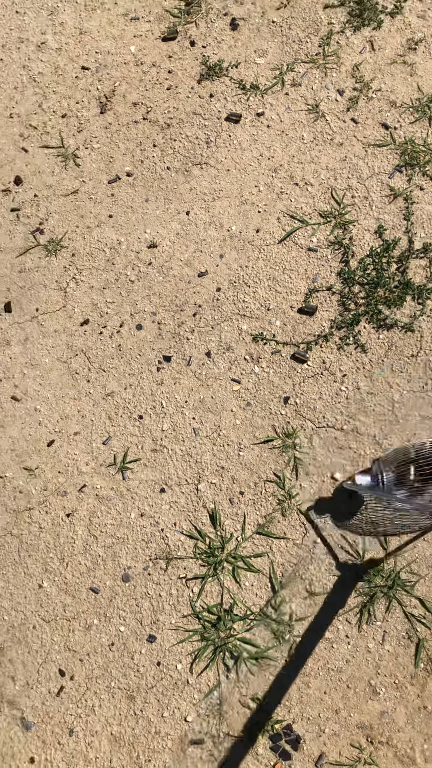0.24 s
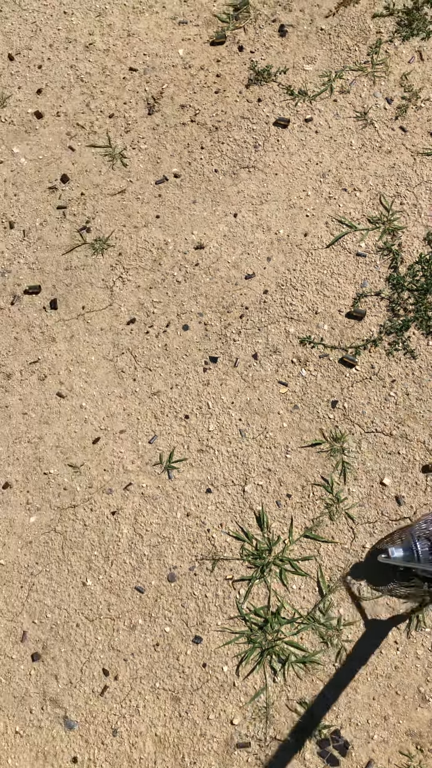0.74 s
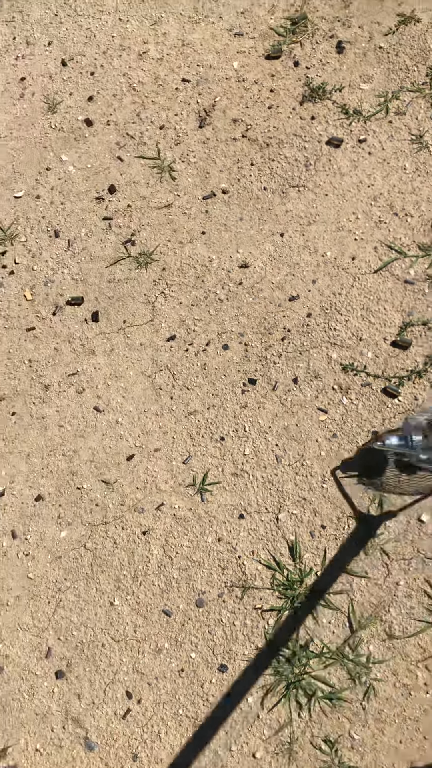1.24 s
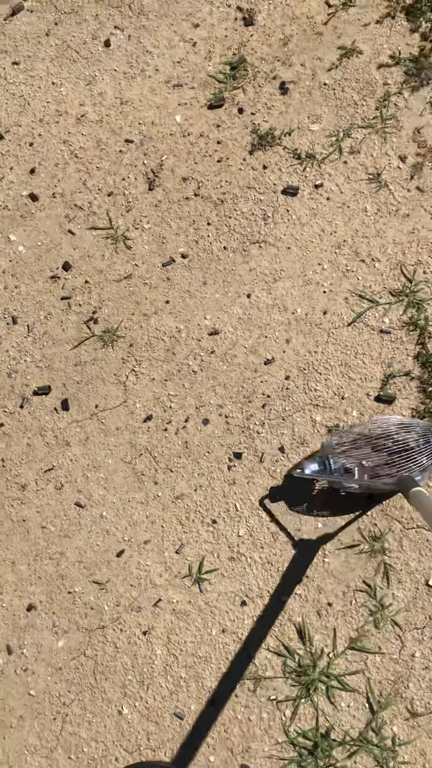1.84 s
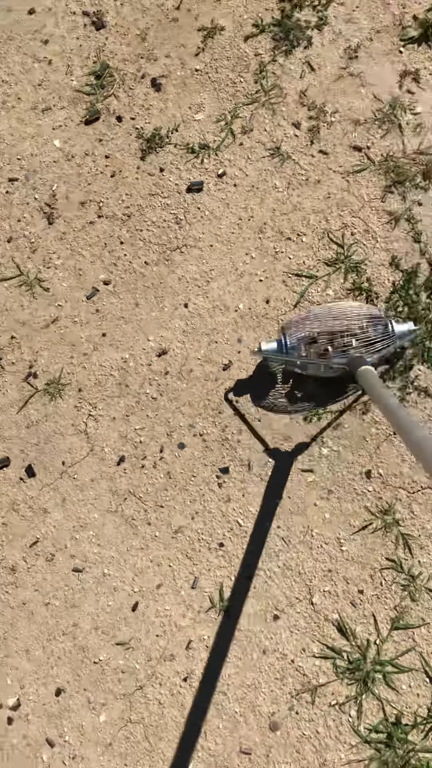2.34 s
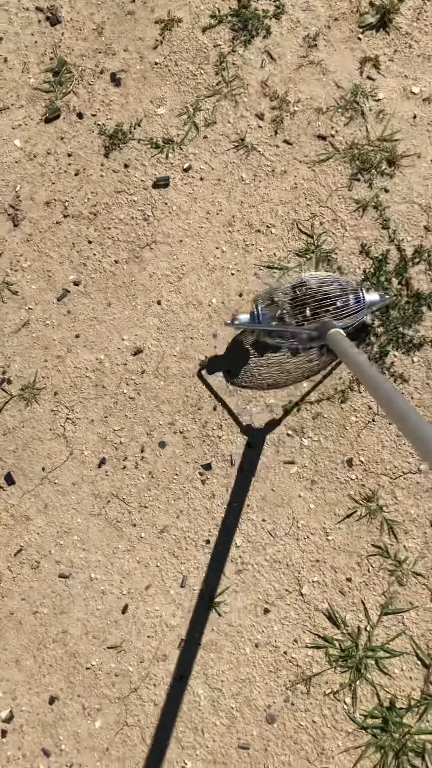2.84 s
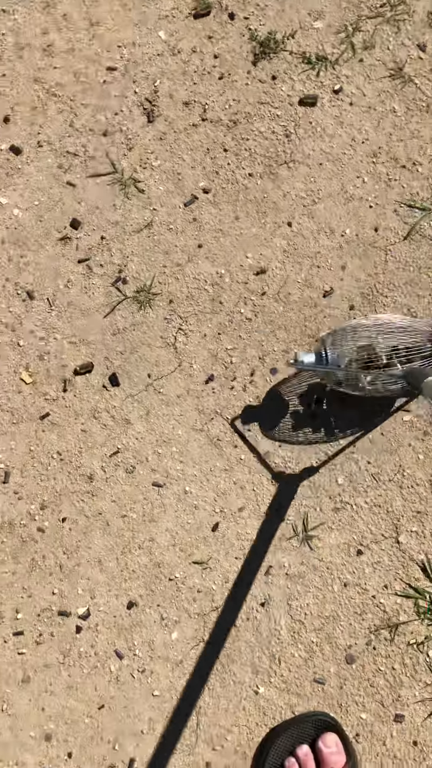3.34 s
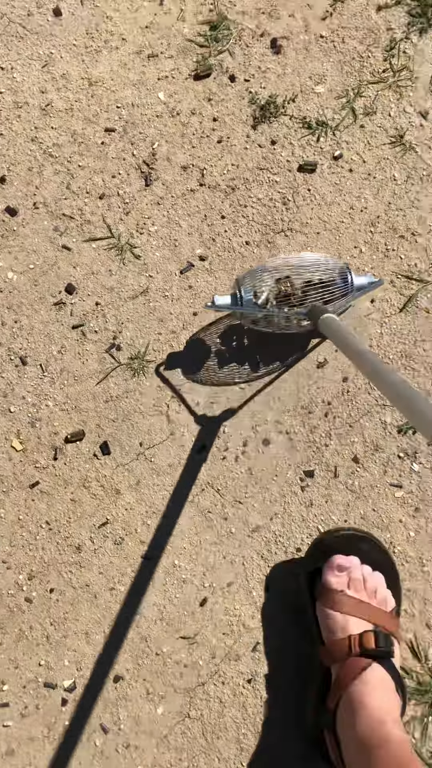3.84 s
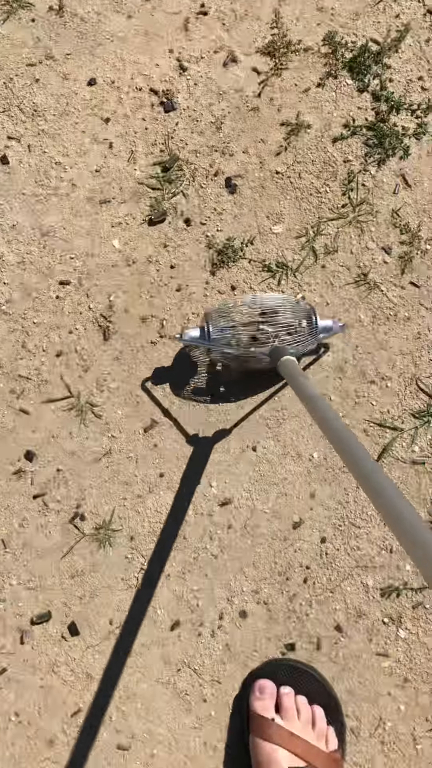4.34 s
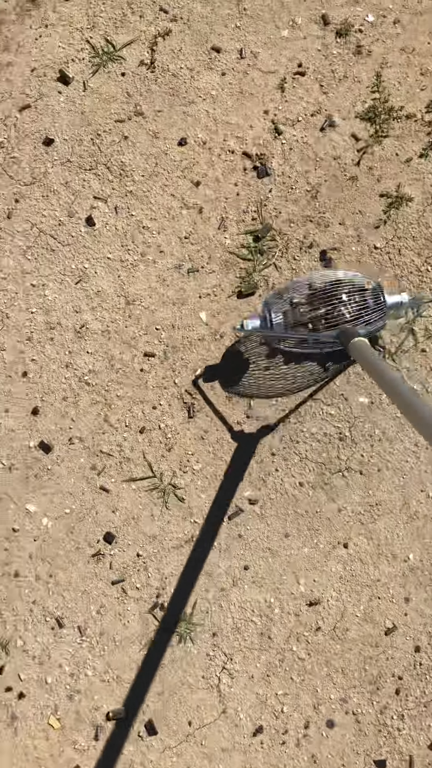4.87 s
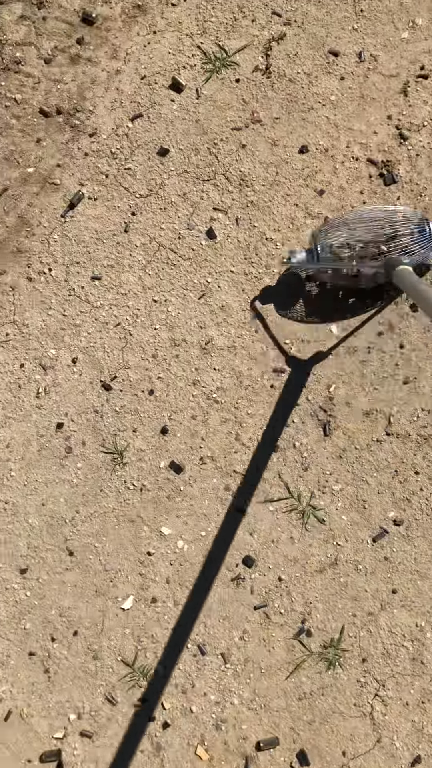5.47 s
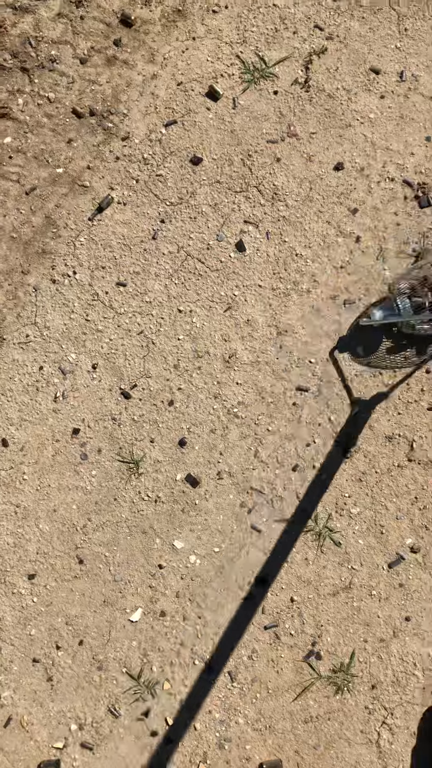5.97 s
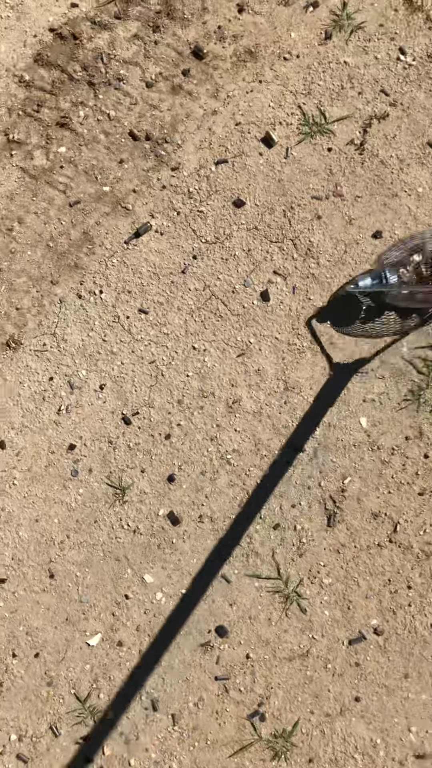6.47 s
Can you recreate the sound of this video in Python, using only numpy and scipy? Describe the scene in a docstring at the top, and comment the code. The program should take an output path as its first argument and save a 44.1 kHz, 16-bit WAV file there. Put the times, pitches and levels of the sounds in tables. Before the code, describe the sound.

Outdoors and dry, close to the microphone, a low breeze and faint distant drone lie under a quiet stir of metal. From about 0.2 s a bright, high jingle of spent brass cases swells inside a rolling wire cage, peaking near 0.5 s with rattle, wire pings and fine gravel grit. It dips, swells again around 1.2 s, then sinks to small ticks and wind bumps at 1.5-1.9 s. A longer stroke jingles from 2.0 to 2.9 s, strongest near 2.3. From 3.0 to 4.1 s there is a lull: wind, faint clinks, light knocks, a soft crunch near 4.0. Brisk tumbling returns at 4.2-5.0 s, with hard knocks around 4.6 and another at 5.07. Jingling builds again to 5.7 s, drops near 6.0, and a strong gust thumps around 6.15 before a last bright rattle peaks at 6.55 and ends still ringing.

```python
"""A low breeze and a quiet stir of metal come first, then a bright jingle swells: a wire-cage nut gatherer
rolls to and fro in short strokes over gravelly dirt, with spent brass cases tumbling inside it.
How hard the load tumbles sets the rattle, the pinging wires and the grit; the jingle of closely tuned cases,
each ringing in a lower and an upper mode, swells and fades on its own curve. Between strokes single cases
settle and grit crunches. Outdoors, no echo; gusts buffet the microphone.
Shaped noise makes wind and grit; fading sine waves make the ringing metal."""
import sys
import numpy as np
from scipy import signal
from scipy.fft import rfft, irfft, next_fast_len
from scipy.io import wavfile
from scipy.ndimage import uniform_filter1d, map_coordinates

SR = 44100
rng = np.random.default_rng(int(sys.argv[2]) if len(sys.argv) > 2 else 0)


def bounce(signal):
    """Save signal as a 16-bit WAV file at the path given by the first command-line argument."""
    frames = np.transpose(np.atleast_2d(signal))
    limited = np.clip(frames, -1, 1)
    pcm = np.round(limited * 32767).astype(np.int16)
    wavfile.write(sys.argv[1], SR, pcm)


N = 295911

# Faint far-away drone, its tone colour: pitch_hz, relative_level_db
DRONE_SPECTRUM = [(20, -23), (55, -21), (70, -7), (78, 6), (86, -12.5), (120, -12), (152, -4.5), (185, -21),
                  (260, -27), (340, -13), (420, -21.5), (800, -44), (2000, -63), (8000, -63)]
# Deep wind rumble, its tone colour: pitch_hz, relative_level_db
RUMBLE_SPECTRUM = [(15, -79), (30, -20), (45, 3.5), (78, 5.5), (150, 6), (220, -8), (340, -16),
                   (500, -29.5), (900, -69), (2500, -59.5)]
# Smaller wind eddies, their tone colour: pitch_hz, relative_level_db
EDDY_SPECTRUM = [(40, -35.5), (110, -13), (160, -2.5), (205, 0), (270, -4.5), (380, -18.5), (600, -37.5),
                 (1500, -62)]
# Lumpy buffeting, its tone colour: pitch_hz, relative_level_db
BUFFET_SPECTRUM = [(40, -9.5), (130, -8), (280, -4.5), (500, -2), (750, -14.5), (1100, -22.5),
                   (2000, -42.5), (5000, -76)]
# Gusts swell and fade on the microphone: centre_s, half_length_s, rumble_db, buffet_db (before layer trims)
GUSTS = [(0.747, 0.016, -28.5, -59), (1.017, .03, -27.5, -60), (1.268, 0.029, -23.5, -62),
         (1.448, 0.079, -30.5, -60), (1.571, 0.037, -26, -43), (1.668, .011, -38, -30),
         (1.876, 0.049, -23, -34.5), (1.957, 0.046, -30.5, -34.5), (2.19, 0.32, -34.5, -76),
         (2.664, 0.032, -28, -38), (2.768, 0.043, -22, -32), (3.09, 0.063, -30.5, -58),
         (3.274, 0.084, -41, -51), (4.1, 0.017, -27.5, -28), (4.46, 0.14, -34.5, -41.5),
         (4.584, 0.064, -28, -33.5), (4.816, 0.14, -32, -53), (5.613, 0.12, -26, -41),
         (5.703, 0.021, -27, -28), (5.802, 0.067, -31, -37.5), (6.164, 0.029, -16, -24),
         (6.304, 0.046, -26, -34), (6.418, 0.043, -29, -43), (6.506, 0.018, -28, -64),
         (6.592, 0.029, -29, -42), (6.678, 0.011, -26, -61)]
# Eddies pop on the microphone: centre_s, level_db (before the pop is shaped), pitch_hz
POPS = [(0.748, -20.5, 209), (1.559, -24, 332), (1.66, -23, 495), (1.864, -16, 301), (1.876, -26, 377),
        (1.921, -19, 293), (2.773, -18.5, 304), (4.081, -23, 400), (4.089, -18, 268), (4.583, -13.5, 300),
        (5.691, -19.5, 496), (6.119, -14, 307), (6.147, -7, 336), (6.159, -32, 293), (6.575, -16.5, 263)]
# Small stones, their tone colour: pitch_hz, relative_level_db
GRAVEL_SPECTRUM = [(200, -16.5), (700, -7), (1300, 2.5), (2200, 3), (4500, -2), (8000, -10), (16000, -23.5)]
# Grit crunches under a sandal or the turning cage: centre_s, half_length_s, level_db
CRUNCHES = [(0.788, 0.045, -56), (1.17, 0.054, -45.5), (1.729, 0.009, -49), (1.911, 0.099, -51),
            (3.535, 0.074, -61.5), (4.003, 0.16, -55), (4.59, 0.06, -45.5), (5.127, 0.071, -56),
            (6.063, 0.045, -48.5)]
# A case or a pebble knocks on a wire: start_s, level_db (before a common trim)
KNOCKS = [(0.0857, -29), (0.441, -18.5), (1.1799, -20.5), (1.274, -26), (1.492, -38), (1.6072, -38),
          (1.81, -34.5), (3.02, -24.5), (3.2993, -33), (3.3866, -32), (3.4798, -33), (4.027, -34),
          (3.8798, -30), (4.082, -42.5), (4.151, -30), (4.583, -9), (4.6284, -6.5), (5.0729, -12.5),
          (5.106, -25.5), (5.1255, -22), (5.903, -34.5), (6.0701, -25.5), (6.56, -10)]
# The snap of a knock, its tone colour: pitch_hz, relative_level_db
KNOCK_SPECTRUM = [(800, -17), (2500, -11), (4000, 7), (5000, -4.5), (6500, 2), (9000, -3.5), (12000, -13.5),
                  (16000, -6)]
# A case falls free and rings: start_s, lower_mode_db, upper_mode_db (both before fading)
CHINKS = [(0.1702, -35, -45), (0.2358, -26, -30.5), (0.428, -27, -28), (0.4803, -15.5, -25),
          (0.5456, -13.5, -27), (0.6657, -20, -37), (1.0914, -15.5, -35), (1.2065, -14.5, -37),
          (1.9008, -26, -42), (1.9812, -12.5, -36), (2.1773, -19, -49), (2.43, -23, -46),
          (3.023, -44.5, -62), (3.107, -55.5, -77), (3.2995, -44.5, -49), (3.392, -52, -70.5),
          (3.5374, -59, -76), (3.687, -61, -71), (3.8793, -42.5, -43.5), (4.5636, -15, -27),
          (4.7413, -16, -36), (5.0738, -27, -45), (5.6138, -16.5, -48), (5.667, -20, -38),
          (5.693, -13, -22.5), (6.353, -19, -27), (6.5322, -11.5, -34.5)]
# Two ways a case mouth rings: pitch_hz, spread_between_cases_hz, relative_level_db, time_to_fade_60_db_s
BRASS_MODES = [(7597, 71, 1.5, 0.16), (11484, 57, -10.5, 0.16)]
# Rattling cases and wires, their tone colour: pitch_hz, relative_level_db
WIRE_SPECTRUM = [(600, -30.5), (1800, -30), (2500, -8), (3800, -3), (4600, -5), (6000, -1), (7000, -0.5),
                 (7600, 11), (8300, 2), (9200, -2.5), (10200, -5), (11500, -1.5), (12600, -5.5),
                 (16000, -7)]
# One curve for each push or pull: time_s, tumbling_db, brass_ring_db (both before layer trims)
STROKES = [
    [(0.0, -62, -48.5), (0.038, -71, -57), (0.104, -49, -51), (0.166, -48, -34.5), (0.542, -36, -22),
     (0.626, -44, -34), (0.67, -42, -25), (0.702, -54, -38.5), (0.73, -59, -35)],
    [(0.76, -49, -38), (0.89, -51, -38), (0.906, -52, -45), (1.204, -35, -21), (1.398, -44, -33.5),
     (1.482, -66, -40.5), (1.492, -51.5, -44), (1.564, -65, -42), (1.57, -72, -54)],
    [(1.61, -46, -53), (1.614, -51, -58), (1.682, -56, -56), (1.714, -67, -60), (1.724, -46, -48.5),
     (1.73, -51, -48), (1.776, -69, -48.5), (1.792, -55, -55), (1.8, -60, -55)],
    [(1.81, -50, -48), (1.842, -52, -37.5), (1.938, -49, -45), (1.974, -43, -29.5), (2.286, -36, -28),
     (2.372, -44, -30), (2.88, -43, -32.5), (2.962, -64, -43.5), (2.99, -87, -52)],
    [(4.151, -47, -47), (4.223, -46, -30.5), (4.371, -54, -45), (4.415, -42, -31.5), (4.515, -44, -26.5),
     (4.609, -34, -23), (4.703, -43, -25.5), (4.771, -35, -23.5), (5.065, -62, -43.5)],
    [(5.13, -61, -43.5), (5.2, -63, -57), (5.232, -42, -33.5), (5.376, -48.5, -33), (5.398, -41, -27),
     (5.724, -38, -23), (5.882, -57, -42), (5.91, -51, -36.5), (5.99, -80, -63.5)],
    [(6.075, -46, -42), (6.101, -46, -35), (6.227, -56, -41.5), (6.279, -39, -29), (6.407, -44, -27.5),
     (6.431, -36, -24.5), (6.549, -39, -19), (6.623, -45, -27.5), (6.71, -55.5, -34.5)],
]

TOP_HZ = 15780  # nothing sounds above this
START_DB_PER_S, SETTLE_DB_PER_S = 2501, 248  # the load starts with a jolt and settles after the stroke
BRISK_DB = -40  # tumbling level of a brisk stroke
GRIT_DB, GRIT_GROWS, GRIT_REST_DB = -50.5, 0.69, -68  # brisk level, dB per dB of tumbling, level at rest
WIRE_DB, WIRE_GROWS = -42, 0.8  # brisk level before trim, dB per dB of tumbling
RING_FLUTTER_DB, RING_FLUTTER_RATE = 2.5, 36  # jingle swell as cases come free; random points a second
BREEZE_DB, BREEZE_SWING_DB, BREEZE_RATE = -40, 3, 14  # rumble before trim, swing, random points a second
CALM_BUFFET_DB = -57.5  # buffeting between the gusts
BUFFET_LEAD_S, BUFFET_SHARE = 0.0069, 0.86  # buffeting peaks early in a gust and lasts this share of it


def amp(db):
    """Turn decibels into a plain multiplier."""
    return 10 ** (np.asarray(db) / 20)


def unit(x):
    """Scale a sound to an overall rms strength of 1."""
    return x / np.sqrt(np.mean(x ** 2) + 1e-20)


def curves(rows):
    """One value per sample for each column after the time."""
    s, *cols = np.transpose(rows)
    return [np.interp(np.arange(N) / SR, s, c) for c in cols]


def wobble(rate):
    """A smooth curve through random points, rate points a second."""
    knots = rng.standard_normal(8192)
    return map_coordinates(knots, [np.arange(N) * rate / SR], mode="wrap")


def coloured(x, spectrum):
    """Give x a tone colour with a filter of unit energy that never sounds ahead of its input."""
    size = 4096
    hz, db = np.transpose(spectrum)
    log_hz = np.log(np.fft.rfftfreq(size, 1 / SR) + 1)
    log_gain = np.log(amp(np.interp(log_hz, np.log(hz), db)))
    # folding the cepstrum puts the filter's energy at its start
    cepstrum = irfft(log_gain)
    fold = np.r_[1, np.full(size // 2 - 1, 2), np.zeros(size // 2)]
    response = irfft(np.exp(rfft(cepstrum * fold)))
    return signal.fftconvolve(x, response / np.linalg.norm(response))[:len(x)]


def steady(x, span):
    """Even out x to about rms 1 over stretches of about span seconds."""
    width = max(int(span * SR), 2)
    power = uniform_filter1d(uniform_filter1d(x ** 2, width), width)
    floor = np.mean(x ** 2) / 1000  # keeps near-silence from being blown up
    return x / np.sqrt(np.abs(power) + floor)


def contacts(rate, scatter_db):
    """Random taps of either sign, rate a second, with sizes scattered in dB."""
    struck = rng.random(N) < rate / SR
    return struck * rng.choice([-1, 1], N) * amp(scatter_db * rng.standard_normal(N))


def avalanches(rate, t60, scatter_db):
    """Force of the tumbling: sudden slips, rate a second, each dying away."""
    slips = contacts(rate, scatter_db) ** 2
    power = signal.lfilter([1], [1, -amp(-120 / (t60 * SR))], slips)
    return unit(np.sqrt(power))


def swell(s, half_s):
    """A bell-shaped rise and fall of height 1 around time s."""
    return np.exp(-((np.arange(N) / SR - s) / half_s) ** 2)


def add(track, s, sound):
    """Mix a sound into the track at time s."""
    start = max(round(s * SR), 0)
    track[start:start + len(sound)] += sound[:max(N - start, 0)]


def tumbling():
    """Rattle and ring levels in dB, rising and settling with each stroke, and how busy the load is (0-1)."""
    t, strokes = np.arange(N) / SR, []
    for stroke in STROKES:
        before = np.maximum(stroke[0][0] - t, 0)
        after = np.maximum(t - stroke[-1][0], 0)
        strokes.append(np.array(curves(stroke)) - START_DB_PER_S * before - SETTLE_DB_PER_S * after)
    level_db, ring_db = np.max(strokes, axis=0)
    return level_db, ring_db, amp(.7 * (level_db - level_db.max()))


def background():
    """A faint low drone from far away, made of shaped noise."""
    return amp(-40.5) * unit(coloured(rng.standard_normal(N), DRONE_SPECTRUM))


def gusting():
    """Levels of rumble and buffeting in dB: gusts on top of a restless breeze."""
    breeze_db = BREEZE_SWING_DB * wobble(BREEZE_RATE)
    rumble, buffet = amp(BREEZE_DB + breeze_db), amp(CALM_BUFFET_DB + breeze_db)
    for s, half_s, rumble_db, buffet_db in GUSTS:
        rumble = np.hypot(rumble, amp(rumble_db) * swell(s, half_s))
        buffet = np.hypot(buffet, amp(buffet_db) * swell(s - BUFFET_LEAD_S, BUFFET_SHARE * half_s))
    return 20 * np.log10(rumble), 20 * np.log10(buffet)


def wind_pops():
    """Each eddy gives the microphone diaphragm one quick push and pull."""
    pops, t = np.zeros(N), np.arange(SR // 20) / SR
    for s, db, hz in POPS:
        cycles = t * hz - 1
        pop = amp(db) * np.sin(2 * np.pi * cycles) * np.exp(-(cycles / 0.34) ** 2)
        add(pops, s - .5 / hz, pop)
    return pops


def wind():
    """A low rumble; stronger gusts break into smaller eddies, then into lumpy buffets and pops."""
    rumble_db, buffet_db = gusting()
    rumble_noise = coloured(rng.standard_normal(N), RUMBLE_SPECTRUM)
    rumble = amp(rumble_db - 1.5) * steady(rumble_noise, span=0.24)
    eddy_db = rumble_db + 0.63 * (buffet_db - rumble_db) + 2.5  # follows both rumble and buffeting
    eddies = amp(eddy_db) * steady(coloured(rng.standard_normal(N), EDDY_SPECTRUM), span=0.11)
    lumpy_noise = rng.standard_normal(N) * amp(6.5 * wobble(170))
    buffet = amp(buffet_db) * steady(coloured(lumpy_noise, BUFFET_SPECTRUM), span=0.094)
    return rumble + eddies + buffet + wind_pops()


def crunches():
    """Weight shifts on the ground and scuffs the grit into bursts of tiny taps."""
    level = sum(amp(db) * swell(s, half_s) for s, half_s, db in CRUNCHES)
    grains = unit(contacts(2500, scatter_db=4.5) * amp(3 * wobble(110)))
    return level * coloured(grains, GRAVEL_SPECTRUM)


def gravel():
    """Small stones grind and snap under the wires, louder the harder the load tumbles."""
    level_db = tumbling()[0]
    moving = amp(GRIT_DB + GRIT_GROWS * (level_db - BRISK_DB))
    level = np.hypot(moving, amp(GRIT_REST_DB))
    snaps = unit(contacts(1800, scatter_db=3) * avalanches(rate=70, t60=.03, scatter_db=4))
    grinding = amp(-1) * rng.standard_normal(N)
    return level * steady(coloured(snaps + grinding, GRAVEL_SPECTRUM), span=0.09)


def knocks():
    """Hard contacts: a snap, a short buzz and the ping of the wire that was hit."""
    track, t = np.zeros(N), np.arange(SR // 10) / SR
    decay = amp(-60 * t / .006) + amp(-15 - 60 * t / .04)  # fast snap, slower buzz
    for s, db in KNOCKS:
        crack = coloured(rng.standard_normal(len(t)) * decay, KNOCK_SPECTRUM)
        ping_hz = rng.normal(5700, 270)
        ping = amp(-28 - 60 * t / 0.039) * np.sin(2 * np.pi * ping_hz * t)
        add(track, s, amp(db - 4) * (crack / np.abs(crack).max() + ping))
    return track


def single_cases():
    """A case rings until a neighbour stops it, which comes sooner in a busy load."""
    track, t = np.zeros(N), np.arange(SR // 5) / SR
    activity = tumbling()[-1]
    for s, db, upper_db in CHINKS:
        free_s = 0.016 + 0.035 / (1 + 45 * activity[round(s * SR)])
        gate = (1 - np.exp(-t / .0008)) / (1 + (t / free_s) ** 4)  # soft start, then the stop
        tuning = rng.normal(0.16, .5)
        for level_db, t60, (hz, spread, _, _) in zip([db, upper_db], [.35, .16], BRASS_MODES):
            tone = np.sin(2 * np.pi * (hz + spread * tuning) * t)
            add(track, s, gate * amp(level_db - 60 * t / t60) * tone)
    return track


def wire_pings(wire_db, activity, clumps, count=16):
    """The cage wires, each of its own pitch, ring briefly; fast tumbling wakes the higher ones."""
    t = np.arange(SR // 20) / SR
    low_hz, high_hz, t60 = 2750, 4080, .024
    pings = np.zeros(N)
    for place in np.linspace(0, 1, count) ** 0.594:  # 0 is the lowest wire, 1 the highest
        blows = contacts(70 + 90 * activity, scatter_db=1.0) * clumps
        blows = blows * amp((-5 + 19 * activity) * place)
        hz = low_hz + (high_hz - low_hz) * place
        ring = amp(-60 * t / t60) * np.sin(2 * np.pi * hz * t)
        pings += signal.oaconvolve(blows, ring)[:N]
    return amp(wire_db - 0.5) * steady(pings, span=0.12)


def rattle(rattle_db, activity, clumps, count=20000):
    """Countless tiny contacts of cases and wires, each with its own pitch, denser in a busy load."""
    when, pitch, chance = rng.random((count, 3)).T
    # place more ticks where the load is busier
    busy = np.cumsum(.2 + activity)
    start = np.searchsorted(busy, when * busy[-1])[:, None]
    hz = 1500 + 14500 * pitch[:, None]
    size_db = np.minimum(-2.4 * np.log(1 - chance), 14)  # mostly small, a few large
    size = amp(size_db)[:, None] * clumps[start]
    n = np.arange(SR // 300)
    ticks = size * np.sin(2 * np.pi * hz * n / SR) * amp(-60 * n / SR / 0.0019)
    crowd = unit(np.bincount((start + n).ravel(), ticks.ravel(), N)[:N])
    sliding = unit(clumps * rng.standard_normal(N))  # cases sliding along the wires
    clicks = amp(-6.5) * unit(contacts(220, scatter_db=-3.5))  # the odd harder tap
    return amp(rattle_db + 8.0) * steady(coloured(crowd + sliding + clicks, WIRE_SPECTRUM), span=0.064)


def mode_ring(mode, tuning):
    """One mode of one case; tuning says how far the case lies from the average, in spreads."""
    hz, spread, db, t60 = mode
    t = np.arange(SR // 5) / SR
    return amp(db - 60 * t / t60) * np.sin(2 * np.pi * (hz + spread * tuning) * t)


def jingle(ring_db, activity, clumps, count=14):
    """Slightly unlike cases are struck at random and beat against each other."""
    tunings = np.linspace(-1, 1, count)
    tunings = tunings + tunings ** 5  # most cases are alike, a few stray
    rings = np.zeros(N)
    for tuning in tunings:
        blows = contacts(12 + 30 * activity, scatter_db=4.0) * clumps
        blows = blows * amp(-1.6 * tuning ** 2)  # stray cases are quieter
        for mode in BRASS_MODES:
            share = 1 + 0.19 * rng.standard_normal(N)  # the spot that is struck favours one mode or another
            rings += signal.oaconvolve(blows * share, mode_ring(mode, tuning))[:N]
    return amp(ring_db + 1.97) * steady(rings, span=0.019)


def rolling():
    """The same small slips of the load drive jingle, rattle and wires together."""
    level_db, ring_db, activity = tumbling()
    ring_db = ring_db + RING_FLUTTER_DB * wobble(RING_FLUTTER_RATE)
    wire_db = WIRE_DB + WIRE_GROWS * (level_db - BRISK_DB)
    slips = .55 + avalanches(rate=500, t60=.009, scatter_db=3.8)
    clumps = slips * amp(1.1 * wobble(130))
    wires = wire_pings(wire_db, activity, clumps)
    return wires + rattle(level_db, activity, clumps) + jingle(ring_db, activity, clumps)


def scene():
    """Air, ground and cage, heard by one microphone."""
    surroundings = background() + wind() + crunches()
    cage = gravel() + knocks() + single_cases() + rolling()
    return (surroundings + cage)[None]


def record(dry):
    """Nothing is kept above the band limit."""
    size = next_fast_len(N + SR // 4)
    kept = np.fft.rfftfreq(size, 1 / SR) < TOP_HZ
    return irfft(rfft(dry, size) * kept, size)[:, :N]


dry = scene()
out = record(dry)
bounce(out)
```